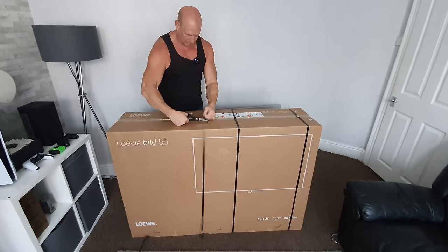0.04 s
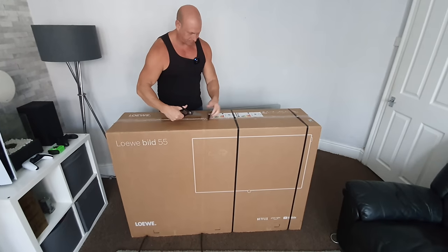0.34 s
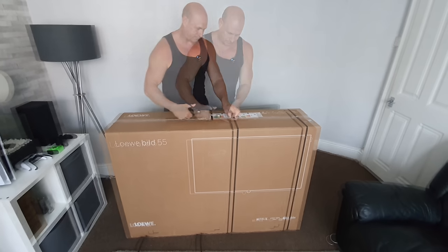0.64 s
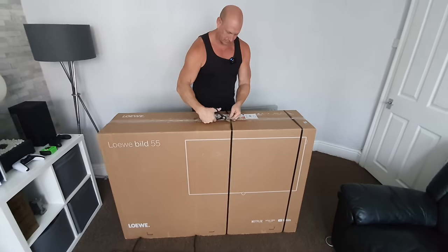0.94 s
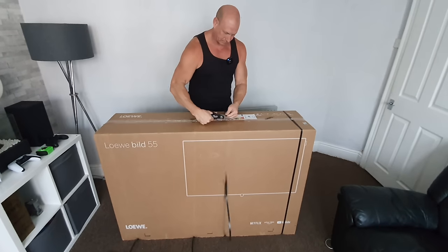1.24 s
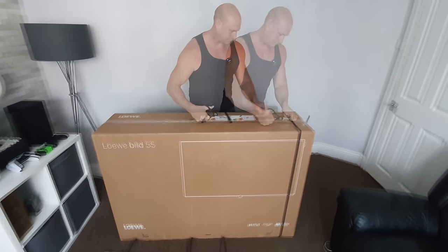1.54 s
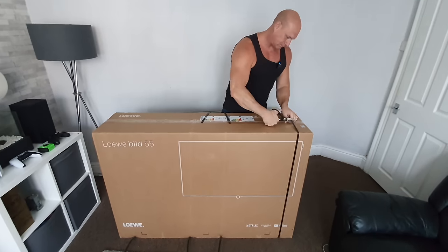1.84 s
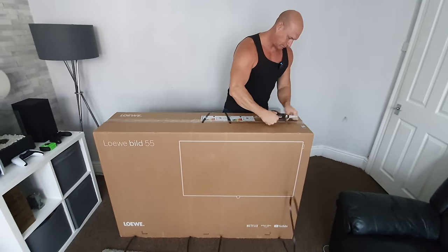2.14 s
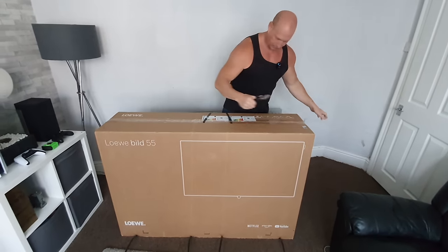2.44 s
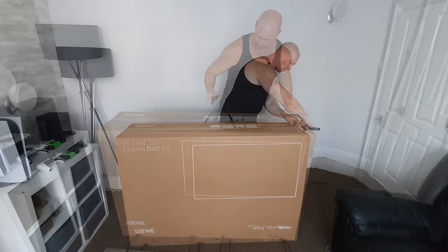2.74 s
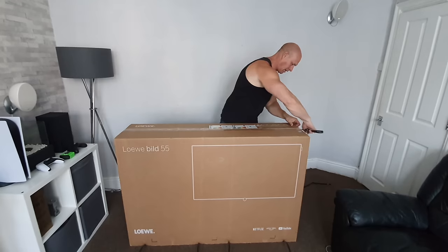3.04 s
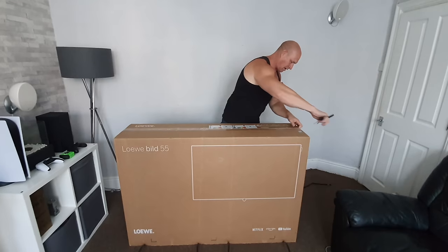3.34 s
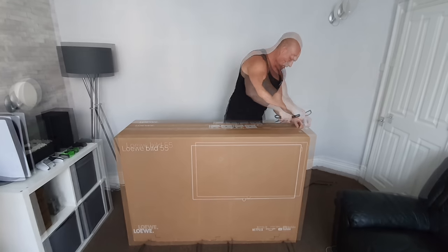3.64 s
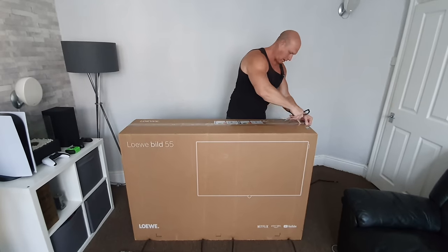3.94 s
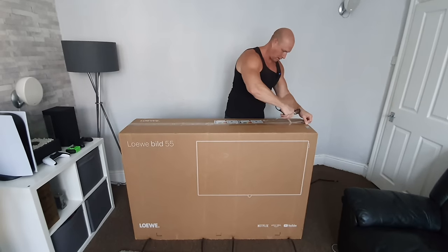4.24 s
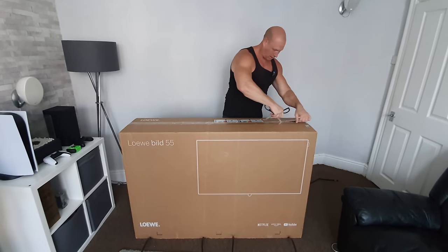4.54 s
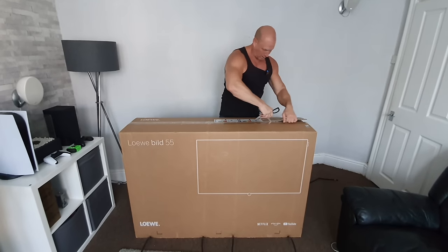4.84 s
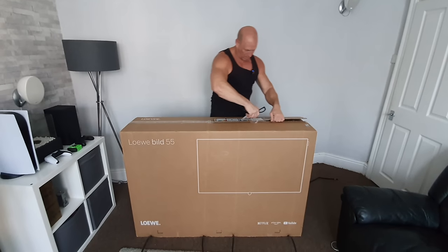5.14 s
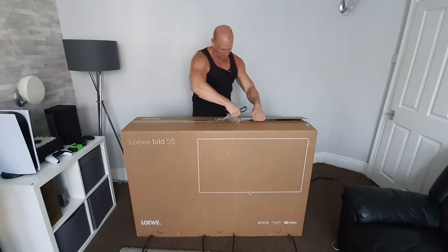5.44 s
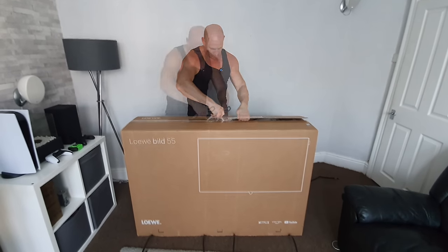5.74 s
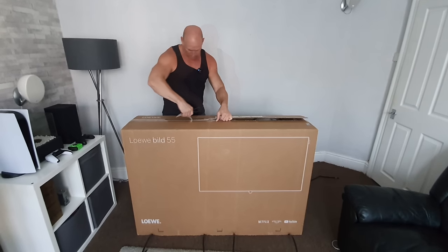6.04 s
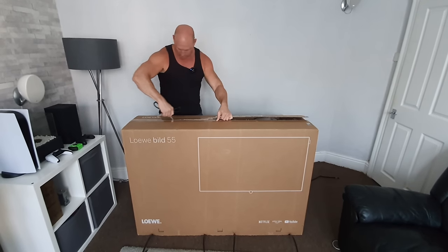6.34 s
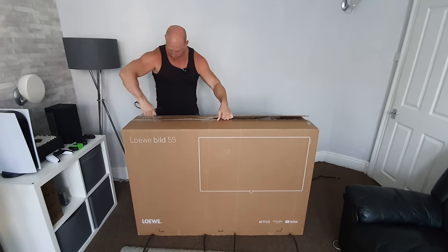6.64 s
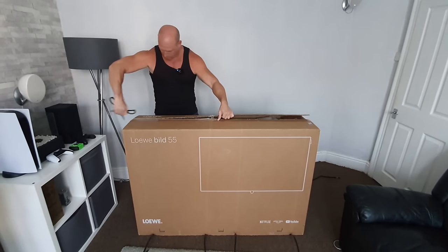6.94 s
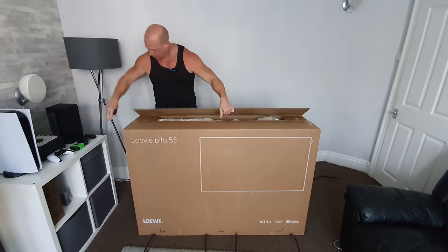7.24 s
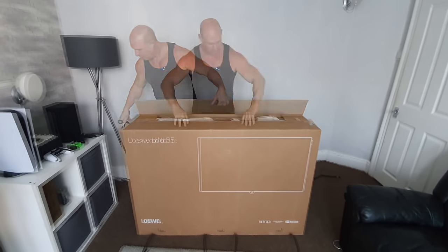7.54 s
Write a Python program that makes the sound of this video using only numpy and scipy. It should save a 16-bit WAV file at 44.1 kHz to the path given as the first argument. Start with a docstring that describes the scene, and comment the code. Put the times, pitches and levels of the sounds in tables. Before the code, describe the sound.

Right at the start, scissors snap through a taut plastic band with a sharp crack and a slap on a large cardboard box. Light taps and knocks follow around 0.4 to 0.7 seconds. Two more bands snap at about 1.2 and 2 seconds, with brief sliding and flicking against the board. Near 3 seconds the scissors tap the box and clack loudly, then hands bump softly on it. From about 4 seconds a blade drags along the taped seam: a gritty hiss and rasp with sharp crackles, over a low juddering drone from the hollow box. The scrape grows louder around 5 seconds and snags repeatedly, hardest near 6.8 seconds. At 7.1 seconds the flap springs up with a loud burst of knocks, followed by a faint slide and tap at 7.5 seconds. The sound is close and mono, in a quiet room with short reverberation.

```python
"""A sharp crack and a slap on cardboard: scissors snip a taut plastic packing band, which flails against a
big box in a living room. Two more bands follow. A blade then pierces the sealing tape and is dragged along
the seam: the tape crackles as it splits and the top panel drones as the blade catches, until the flap
springs up with a burst of knocks. One close microphone, the same in both channels."""
import sys
import numpy as np
from scipy import signal
from scipy.fft import rfft, irfft
from scipy.io import wavfile
from scipy.ndimage import uniform_filter1d

SR = 44100
rng = np.random.default_rng(int(sys.argv[2]) if len(sys.argv) > 2 else 0)


def persist_wave(psi):
    """Save psi, clipped to +-1, as 16-bit WAV."""
    counts = np.round(np.clip(psi, -1, 1) * 32767).astype(np.int16)
    wavfile.write(sys.argv[1], SR, np.atleast_2d(counts).T)


N = 333893
TIME = np.arange(N) / SR
AGE = TIME[:N // 20]   # seconds since a hit

# Levels in the tables are relative: each layer's filters and faders come after them.
# Colour of the room tone and of the reverb. Each row: frequency in Hz, level in dB.
ROOM_TONE = [(40, -27), (100, -10), (200, 1.5), (380, -9), (550, -4.5), (750, -6), (1030, -3),
             (1350, -23.5), (2500, -23.5), (5500, -27.5), (9000, -33), (16000, -54.5)]
REVERB_COLOUR = [(50, -6), (120, 2), (300, 4.5), (600, 2.5), (1200, 1), (2500, -1.5), (4500, -7),
                 (8000, -9.5), (11000, -9), (16000, -23)]
# Reverb decay. Each row: frequency in Hz, seconds to fall 60 dB.
REVERB_DECAY = [(60, 0.42), (200, 0.44), (500, 0.5), (1500, 0.48), (4000, 0.42), (8000, 0.38), (16000, .3)]

# Hands rub the board. Each row: midpoint and length in seconds, level in dB, centre in Hz.
HAND_RUBS = [(0.027, 0.053, -30.5, 215), (.626, 0.044, -30.5, 235), (0.928, 0.21, -53, 230),
             (1.111, 0.067, -38.5, 250), (1.154, .06, -27.5, 180), (1.539, .08, -39.5, 270),
             (2.018, 0.078, -34, 260), (3.823, 0.086, -44.5, 130)]
# Handled bands rustle. Each row: midpoint and length in seconds, level in dB.
BAND_RUSTLES = [(0.63, 0.027, -61), (0.902, 0.22, -65.5), (1.784, 0.07, -71), (1.99, .08, -59),
                (2.927, .09, -48), (2.997, .16, -41.5)]
# Hands shift on the box. Each row: start and end in seconds, level in dB.
HAND_SHIFTS = [(1.69, 1.8, -44), (3.574, 3.69, -39.5), (3.78, 4.1, -35.5)]
# Bands, blades and hands slide on the board; the flap flexes and puffs air.
# Each row: midpoint and length in seconds, level in dB, centre and width in Hz.
BOARD_SLIDES = [(.027, 0.03, -39, 6300, 5600), (0.31, 0.33, -49.5, 500, 402),
                (0.46, 0.029, -47, 3500, 2500), (.72, 0.38, -52.5, 4800, 5700),
                (1.155, .05, -34.5, 8000, 5000), (1.27, .24, -31, 530, 27), (1.21, 0.11, -27.5, 1800, 920),
                (2.25, 0.24, -44.5, 6700, 4700), (1.1, .04, -59, 5000, 6000),
                (2.77, 0.066, -44, 1945, 1790), (3.3, 0.36, -56.5, 4100, 6120),
                (4.73, 0.024, -38, 7970, 420), (5.826, 0.056, -33, 4500, 500),
                (5.82, 0.047, -33, 12500, 3500), (6.025, 0.066, -39, 4000, 460),
                (6.59, 0.033, -37, 1800, 160), (6.9, 0.035, -32.5, 1900, 160), (6.82, 0.31, -35, 710, 570),
                (7.48, 0.26, -59, 3300, 5200)]
FLAP_PUFFS = [(3.11, 0.18, -45, 63, 45), (5.37, 0.14, -34, 64, 27), (7.17, 0.22, -34, 49, 27),
              (7.13, 0.1, -14.5, 293, 44)]

# Modes of the big panels, the hand-damped blades and the scissor shanks held in the fist.
# Each row: frequency in Hz, level in dB, seconds to fall 60 dB.
PANEL_RING = [(100, -5.5, 0.09), (126.9, 0.5, 0.29), (156, -0.5, 0.36), (208.5, -6, 0.66)]
BLADE_RING = [(3850, -7, .009), (4600, 0, .007), (6550, 1, .005), (8000, -2, .005), (11300, -15, .003)]
SHANK_RING = [(1480, 0, .011), (2750, 0, .007), (4300, -2, .004), (7500, -3, .002)]
# Resonances of the box walls. Each row: centre and width in Hz, level in dB.
WALL_RESONANCES = [(254, 87, 1.5), (550, 30, -3.5), (770, 110, -6.5), (1100, 120, -10.5), (1620, 800, -5),
                   (2730, 850, -6.5)]
# Loose bands, scissors and flap hit the box.
# Each row: start in seconds, level in dB, pitch of the dent in Hz, surface crack in dB.
BOX_KNOCKS = [(0.651, -18.5, 300, -27.5), (.659, -20.5, 1000, -31), (.666, -16.5, 940, -26),
              (.671, -25, 294, -25.5), (0.737, -21.5, 395, -44), (.861, -31.5, 383, -49),
              (1.438, -19.5, 400, -28), (1.520, -22.5, 321, -40.5), (1.919, -37, 272, -63),
              (2.747, -28, 1300, -32), (3.065, -11.5, 574, -12.5), (3.072, -15.5, 270, -17.5),
              (3.697, -31, 153, -50), (4.126, -23.5, 1210, -28), (5.705, -15.5, 1240, -18),
              (7.091, -3, 700, -17), (7.0935, -9, 290, -34), (7.119, -1.5, 636, -13),
              (7.127, -1.5, 294, -8), (7.134, -9.5, 764, -32), (7.517, -31.5, 720, -28.5)]
# Scissors tap the stiff edge of the box.
# Each row: start in seconds, level in dB, pitch of the dent in Hz, steel ring in dB.
EDGE_TAPS = [(0.3936, -10.5, 614, -32), (0.4951, -20, 560, -47), (.838, -32, 1340, -40),
             (1.974, -20, 427, -48), (2.914, -23.5, 700, -19.5), (2.957, -16, 594, -20)]
# The blades tick. Each row: start in seconds, level in dB, brightness in dB per octave.
BLADE_TICKS = [(2.996, -17, 9), (3.0567, -1, 12), (4.678, -15.5, 7), (5.1177, -13, 23), (5.94, -18, 34),
               (6.0077, -11, -24), (6.3864, -7, 14), (7.025, -13.5, 22), (7.091, -3.5, -7)]
# Plastic and tape crack on their own. Each row: start in seconds, level in dB, centre in Hz.
STRAY_CRACKS = [(.340, -29, 4460), (.381, -32, 7900), (.407, -27.5, 7920), (1.086, -48, 5950),
                (1.335, -20.5, 8200), (2.013, -24, 7080), (2.018, -22, 6980), (2.756, -33, 3470),
                (2.977, -26.5, 9030), (3.69, -30.5, 4000), (5.0462, -13.5, 3940), (5.133, -24, 4000),
                (5.2862, -16.5, 6000), (5.2992, -16, 5900), (5.384, -20.5, 4800), (5.474, -17, 4300),
                (5.5728, -13, 5600), (5.615, -21, 6000), (5.655, -18, 5000), (5.66, -22, 8000),
                (5.992, -27, 4420), (6.046, -23, 3700)]

# The blade's ride along the seam. Each row: time in seconds, push on the panel in dB, tape hiss in dB.
SEAM_LEVELS = [(3.6, -64, -61.5), (3.69, -68, -55), (3.77, -68, -61), (4.05, -46, -48),
               (4.15, -32.5, -45.5), (4.46, -33.5, -43.5), (4.72, -28.5, -45), (4.92, -32.5, -45),
               (5.11, -22, -36.5), (5.27, -28.5, -43), (5.30, -27, -37), (5.40, -24.5, -39),
               (5.52, -24.5, -39), (5.72, -32.5, -38), (5.79, -39, -47.5), (5.82, -24.5, -39),
               (6.05, -34, -38.5), (6.14, -25, -41.5), (6.42, -26.5, -35), (6.95, -26, -39.5),
               (7.06, -21.5, -61)]
# The top panel drones lowest at its slack middle. Each row: time in seconds, pitch in Hz.
DRONE_PITCH = [(3.95, 274), (4.8, 278), (5.12, 245), (5.4, 276), (5.81, 256.6), (6.47, 290), (7.06, 295)]
# Steel scrapes on tape, tuned by the slant of the blade. Each row: time in seconds, pitch in Hz.
SCRAPE_PITCH = [(4.2, 7940), (5.7, 8200), (5.9, 9300), (6.3, 7240), (6.6, 8700), (6.95, 7100)]
# Colours of the drag: panel rumble, board rasp, tape hiss. Each row: frequency in Hz, level in dB.
RUMBLE_EQ = [(45, -38), (65, -8), (90, -7), (112, 14.5), (140, -5), (190, 10.5), (260, -9), (400, -31.5)]
RASP_EQ = [(250, 6), (390, 13), (500, 4.5), (650, 0.5), (850, 2), (1150, -2), (1400, -7), (1850, -4.5),
           (2400, -25.5), (3500, -31), (6000, -83)]
HISS_EQ = [(1500, 6.5), (2500, 5), (3300, 2), (4400, 6), (5400, 5.5), (6400, 8.5), (8000, 4.5), (10000, 5),
           (12500, -6), (16000, -12)]
# The blade snags in the board. Each row: midpoint in seconds, panel swing in dB, rasp in dB.
BLADE_SNAGS = [(3.999, -39.5, -35), (4.093, -32, -45), (4.135, -30, -33), (4.175, -27.5, -40),
               (4.223, -37, -24), (4.255, -26, -37), (4.276, -28, -32), (4.307, -25, -31), (4.34, -30, -46),
               (4.385, -26, -45), (4.415, -25.5, -36), (4.52, -26.5, -37), (4.553, -27, -33),
               (4.59, -24, -35), (4.685, -30, -30), (4.729, -26, -37.5), (4.757, -27.5, -42),
               (4.822, -31, -42), (4.973, -24.5, -32.5), (5.072, -17.5, -25.5), (5.106, -15.5, -28),
               (5.176, -13.5, -32), (5.295, -31, -28), (5.34, -19.5, -38), (5.389, -29, -38),
               (5.525, -25, -46), (5.832, -23, -35), (5.888, -21, -38), (6.012, -22.5, -34),
               (6.166, -23.5, -31), (6.227, -24, -34), (6.289, -37, -34), (6.597, -23.5, -31.5),
               (6.614, -24, -29), (6.668, -26, -25.5), (6.746, -27, -29), (6.786, -12.5, -23.5),
               (6.854, -19, -23.5), (6.915, -16.5, -25), (6.952, -20, -35)]
# A tape snap timed after all other events, past the end of the track, so it is not heard.
# One row: break time in seconds, level in dB, build-up in seconds.
LATE_TAPE_SNAP = (8.4, -7, 0.0028)
# Scissors go through a band. Each row: break time in seconds, crack in dB, build-up in seconds,
# lead of the bite in seconds, bite in dB, blade brightness in dB per octave, box recoil in dB,
# recoil pitch in Hz, slap in dB, slap pitch in Hz.
BAND_SNIPS = [(0.049, -1.5, 0.00092, 0.0064, -10.5, 0.5, -3, 480, -5.5, 870),
              (1.1694, -9.5, 0.0045, 0.0048, -6.5, 5, -4, 450, -8, 760),
              (2.0393, -3, 0.0032, 0.016, -7.5, 1, -5, 564, -12, 760)]


def from_db(db):
    """Decibels to gain."""
    return 10 ** (np.asarray(db) / 20)


def unit_rms(x):
    """Scale to unit power."""
    return x / np.sqrt(np.mean(x ** 2) + 1e-20)


def unit_peak(x):
    """Scale to a peak of one."""
    return x / np.max(np.abs(x))


def at_hz(points, hz):
    """Read a table on a log-frequency axis."""
    table = np.array(points)
    return np.interp(np.log(hz + 1), np.log(table[:, 0]), table[:, 1])


def add(track, s, sound):
    """Mix a sound into the track from time s on."""
    start = max(round(s * SR), 0)
    track[start:start + len(sound)] += sound[:N - start]


def cut(x, hz, kind, order=2):
    """Butterworth filter."""
    return signal.sosfilt(signal.butter(order, np.clip(hz, 10, .48 * SR), kind, fs=SR, output="sos"), x)


def resonance(x, hz, width_hz):
    """Two-pole resonance with gain 1 at its peak."""
    r = np.exp(-np.pi * width_hz / SR)
    poles = [1, -2 * r * np.cos(2 * np.pi * hz / SR), r * r]
    return signal.lfilter(np.array([1, 0, -1]) * (1 - r * r) / 2, poles, x + 1e-18)


def gliding_resonance(x, hz, width_hz):
    """A resonance that follows a pitch curve."""
    carrier = np.exp(2j * np.pi * np.cumsum(hz) / SR)
    return np.real(carrier * cut(x / carrier, width_hz / 2, "low"))


def coloured(x, eq):
    """EQ a steady texture and bring it to unit power."""
    return unit_rms(irfft(rfft(x) * from_db(at_hz(eq, np.fft.rfftfreq(N, 1 / SR))), N))


def levelled(x, span_s):
    """Ride the gain to unit power over each span, so only quick flutter stays."""
    return x / np.sqrt(np.abs(uniform_filter1d(x ** 2, int(span_s * SR))) + 1e-9)


def wander(per_s):
    """A drifting control: ramps between random values of unit spread."""
    knots = rng.standard_normal(int(per_s * N / SR) + 2)
    return np.interp(TIME * per_s, np.arange(len(knots)), knots)


def slips(per_s, spread_db):
    """Stick and slip: random clicks of very uneven size."""
    sizes = from_db(spread_db * np.minimum(rng.exponential(1, N), 4)) * rng.choice([-1, 1], N)
    return sizes * (rng.random(N) < per_s / SR)


def struck(modes, spread_db, detune):
    """One hit: every mode rings with a strength and tuning of its own."""
    hz, db, t60 = np.array(modes).T[:, :, None]
    strength, tuning = rng.standard_normal((2, len(modes), 1))
    decays = from_db(db + spread_db * strength - 60 * AGE / t60)
    return np.sum(decays * np.sin(2 * np.pi * hz * (1 + detune * tuning) * AGE), axis=0)


def smeared_click(transit_s):
    """A click runs to and fro in thin material: spread in time, flat in spectrum."""
    click = signal.unit_impulse(len(AGE))
    for lag in np.ceil(rng.uniform(.3, 1, 4) * transit_s * SR).astype(int):
        allpass = np.r_[1, np.zeros(lag), .5]
        click = signal.lfilter(allpass[::-1], allpass, click + 1e-18)
    return click


def room_tone():
    """The bed: faint, dark noise of a quiet room."""
    return from_db(-60.5) * coloured(rng.standard_normal(N), ROOM_TONE)


def room_response(first_echo_s=.00083, build_s=.0081):
    """Dense echoes off near walls, dying band by band."""
    edges = np.geomspace(40, 18000, 25)
    late = np.maximum(TIME[:SR] - first_echo_s, 0)
    fade_in = 1 - np.exp(-late / build_s)
    white, out = rng.standard_normal((2, SR)), 0
    for k, (low, high) in enumerate(zip(edges, edges[1:])):
        hz = np.sqrt(low * high)
        band = cut(white[k % 2], [low, high], "band") * from_db(-60 * late / at_hz(REVERB_DECAY, hz))
        band *= fade_in
        unity_gain = np.sqrt(2 * (high - low) / SR / np.sum(band ** 2))
        out += band * unity_gain * from_db(at_hz(REVERB_COLOUR, hz))
    return out


def room_reverb(send, positions=6):
    """Echo patterns crossfade as the sources move along the box."""
    out, place = np.zeros(N), np.linspace(0, positions - 1, N)
    for k in range(positions):
        near = np.flatnonzero(np.abs(place - k) < 1)
        crossfade = np.cos(np.pi / 2 * (place[near] - k))
        add(out, TIME[near[0]], signal.fftconvolve(send[near] * crossfade, room_response()))
    return out


def crack_wash(send, level_db=-1, build_s=.0074):
    """The room smears a crack into noise: each band stores its energy and lets it die away."""
    edges = np.geomspace(700, 17000, 11)
    white, out = rng.standard_normal((2, N)), 0
    for k, (low, high) in enumerate(zip(edges, edges[1:])):
        hz = np.sqrt(low * high)
        energy = cut(send + 1e-9, [low, high], "band") ** 2 + 1e-18
        release, attack = from_db(-120 / (at_hz(REVERB_DECAY, hz) * SR)), np.exp(-1 / (build_s * SR))
        for pole in (release, attack):
            energy = signal.lfilter([1 - pole], [1, -pole], energy)
        noise = unit_rms(cut(white[k % 2], [low, high], "band"))
        out += from_db(level_db + at_hz(REVERB_COLOUR, hz)) * np.sqrt(energy) * noise
    return out


def rubs_and_rustles():
    """Skin creeps over the board in tiny slips and loose bands crinkle; each move swells and fades."""
    creep, crinkle = slips(per_s=1500, spread_db=2.5), slips(per_s=1600, spread_db=4)
    crinkle = levelled(cut(resonance(crinkle, 4200, width_hz=6000), 1100, "high"), span_s=.079)
    rubs = [(*row, levelled(resonance(creep, hz, width_hz=76), span_s=.053)) for *row, hz in HAND_RUBS]
    rustles = [(*row, crinkle) for row in BAND_RUSTLES]
    out = np.zeros(N)
    for s, length_s, db, friction in rubs + rustles:
        swell, start = signal.windows.hann(int(length_s * SR)), int(s * SR)
        add(out, s - length_s / 2, from_db(db) * swell * friction[start:start + len(swell)])
    return out


def swishes(rows):
    """Friction or moving air: noise swells and fades in one resonance."""
    out = np.zeros(N)
    for s, length_s, db, hz, width_hz in rows:
        swell = signal.windows.hann(int(length_s * SR))
        friction = resonance(rng.standard_normal(SR), hz, width_hz)[-len(swell):]
        add(out, s - length_s / 2, from_db(db) * swell * unit_rms(friction))
    return out


def hand_bump_cues(gap_s=.064, hz=190, spread_db=5.5):
    """Soft, uneven bumps on the box while the hands shift."""
    cues = []
    for start, end, db in HAND_SHIFTS:
        for k, (late, strength, pitch) in enumerate(rng.uniform(-1.2, 1, (8, 3))):
            s = start + gap_s * (k + .5 * abs(late))
            if s < end:
                cues.append((s, db + spread_db * strength, hz * 2 ** (.5 * pitch)))
    return cues


def cardboard_knocks(cues, dent_cycles, rattle_db, rattle_s, swing_db, walls_db, low_cut_hz):
    """The board dents and springs back; its flutes rattle and the big panels swing on."""
    dents, panels = np.zeros(N), np.zeros(N)
    for s, db, hz in cues:
        dent = unit_peak(np.sin(2 * np.pi * hz * AGE) * AGE * np.exp(-AGE * hz / dent_cycles))
        rattle = unit_rms(resonance(rng.standard_normal(len(AGE)), hz, hz)) * np.exp(-AGE / rattle_s)
        add(dents, s, from_db(db) * cut(dent + from_db(rattle_db) * rattle, 3.5 * hz, "low", order=4))
        panel_db = db + swing_db - 6 * np.log2(hz / 303.5)   # broad, low dents swing the panels most
        add(panels, s, from_db(panel_db) * struck(PANEL_RING, spread_db=2, detune=.03))
    walls = sum(from_db(db + walls_db) * resonance(dents, hz, width) for hz, width, db in WALL_RESONANCES)
    return cut(dents + panels + walls, low_cut_hz, "high", order=5)   # the box radiates little deep bass


def scissor_taps():
    """Scissors knock on the stiff edge of the box and their shanks ring briefly."""
    out = cardboard_knocks([row[:3] for row in EDGE_TAPS], dent_cycles=.37, rattle_db=-17, rattle_s=.006,
                           swing_db=-21, walls_db=-7, low_cut_hz=110)
    for s, _, _, db in EDGE_TAPS:
        ring = struck(SHANK_RING, spread_db=2, detune=.02)
        add(out, s, from_db(db) * unit_peak(signal.fftconvolve(smeared_click(transit_s=.0005), ring)))
    return out


def blade_clacks(cues):
    """Steel meets steel, chatters for an instant and rings briefly."""
    out = np.zeros(N)
    for s, db, tilt in cues:
        modes = [(hz, level + tilt * np.log2(hz / BLADE_RING[0][0]), t60) for hz, level, t60 in BLADE_RING]
        ring = struck(modes, spread_db=1, detune=.035)
        chatter = signal.fftconvolve(smeared_click(transit_s=.0002), ring)
        add(out, s, from_db(db) * unit_peak(cut(chatter, 3200, "high", order=3)))
    return out


def cracks(cues, transit_s, width_ratio, low_cut_hz):
    """Plastic, tape or the board's surface cracks in tiny, wide-band bursts."""
    out = np.zeros(N)
    for s, db, hz in cues:
        add(out, s, from_db(db) * unit_peak(resonance(smeared_click(transit_s), hz, width_ratio * hz)))
    return cut(out, low_cut_hz, "high", order=1)


def tape_split_cues(per_s=12, over_hiss_db=3.5, spread_db=5, hz=7300):
    """The tape splits ahead of the blade at random moments, riding the level of its hiss."""
    s, _, hiss_db = np.transpose(SEAM_LEVELS)
    wait, strength, pitch = rng.random((80, 3)).T
    times = s[0] + np.cumsum(-np.log(1 - wait)) / per_s
    db = np.interp(times, s, hiss_db) + over_hiss_db + spread_db * (2 * strength - 1)
    return [cue for cue in zip(times, db, hz * 2 ** (2 * pitch - 1)) if cue[0] < s[-1]]


def stroke(rows):
    """Automation for the drag: blade contact from 0 to 1, then a curve for each column after the time."""
    s, *columns = np.transpose(rows)
    contact = np.interp(TIME, [s[0] - .03, s[0], s[-1], s[-1] + .027], [0, 1, 1, 0])
    return [contact] + [np.interp(TIME, s, column) for column in columns]


def snags(length_s=.0299):
    """Each snag swings the panel for a few cycles near its drone pitch and lifts the rasp's envelope."""
    swings, rasp_lift, swell = np.zeros(N), np.zeros(N), signal.windows.hann(int(length_s * SR))
    for s, swing_db, rasp_db in BLADE_SNAGS:
        hz = np.interp(s, *np.transpose(DRONE_PITCH)) * (1 + .043 * rng.standard_normal())
        tone = np.sqrt(2) * np.sin(2 * np.pi * hz * AGE[:len(swell)])
        add(swings, s - length_s / 2, from_db(swing_db) * swell * tone)
        add(rasp_lift, s - length_s / 2, from_db(rasp_db) * swell)
    return swings, rasp_lift


def panel_drone(catches):
    """The catching blade shakes the top panel: a gliding drone over a rumble."""
    pressing, pitch = stroke(DRONE_PITCH)
    drone = levelled(gliding_resonance(catches, pitch, width_hz=154), span_s=.0475)
    rumble = levelled(coloured(catches, RUMBLE_EQ), span_s=.076)
    return pressing * (from_db(-5) * drone + from_db(-8.5) * rumble)


def board_rasp(catches, grains):
    """The blade rasps on cardboard, with a hollow note from the gap under the flap."""
    gap_hz = 620 * np.exp(.18 * wander(per_s=13))
    hollow = unit_rms(gliding_resonance(catches, gap_hz, width_hz=172))
    return levelled(coloured(catches + .5 * grains, RASP_EQ) + from_db(-7) * hollow, span_s=.029)


def tape_hiss(grains):
    """Tape parts in fine grains while the steel grips it and lets go by turns."""
    _, pitch = stroke(SCRAPE_PITCH)
    hiss = levelled(coloured(grains, HISS_EQ), span_s=.3)
    for ratio in (1, .548):   # the blade's pitch and a lower mode
        grip = from_db(-14 + 6 * wander(per_s=22))
        hiss += grip * unit_rms(gliding_resonance(grains, ratio * pitch, width_hz=1840))
    return hiss


def seam_drag(lurch_db=.5, judder_db=4, spurt_db=1.3, rasp_follows_push=.59):
    """The blade is dragged down the seam; returns the panel's low end and the scrape above it."""
    cutting, push_db, tape_db = stroke(SEAM_LEVELS)
    push_db += lurch_db * wander(per_s=16)   # the hand advances in small jerks
    board_db = tape_db + rasp_follows_push * (push_db - tape_db)
    judder = from_db(judder_db * wander(per_s=50))   # the blade sticks and runs free by turns
    catches = unit_rms(slips(per_s=600, spread_db=3))
    grains = unit_rms(unit_rms(slips(per_s=4500, spread_db=3.8)) + .25 * catches)
    rasp = board_rasp(catches, grains)
    swings, snag_lift = snags()
    hiss = tape_hiss(grains)
    spurts = from_db(tape_db - 2.5 + spurt_db * wander(per_s=27))   # the tape tears in spurts
    rasp_gain = judder * from_db(board_db - 3) + snag_lift
    hiss_gain = np.sqrt(judder) * spurts + from_db(-16) * snag_lift
    panel = judder * from_db(push_db) * panel_drone(catches) + swings
    return panel, cutting * (rasp_gain * rasp + hiss_gain * hiss)


def blade_entry_cues(bite_lengths=4.1, db=-53, hz=6000, width_hz=5000):
    """Steel hisses under the band into each snip; the slower the bite, the longer the hiss."""
    return [(s - bite_lengths * bite_s / 2, bite_lengths * bite_s, db, hz, width_hz)
            for s, _, _, bite_s, *_ in BAND_SNIPS]


def snip_cues(bite_hz=7000, recoil_lead_s=.001, shut_lag_s=.0042, slap_gap_s=.006, slap_loss_db=1.5):
    """The blades bite, the box recoils, the band breaks, the blades shut and the freed band flails."""
    breaks, shuts, bites, hits = [], [], [], []
    for s, db, build_s, bite_s, bite_db, tilt, recoil_db, recoil_hz, slap_db, slap_hz in BAND_SNIPS:
        breaks.append((s, db, build_s))
        shuts.append((s + shut_lag_s, .5, tilt))
        bites.append((s - bite_s, bite_db, bite_hz))
        hits.append((s - recoil_lead_s, recoil_db, recoil_hz))
        for k, (late, pitch) in enumerate(rng.uniform(-1, 1, (6, 2))):
            slap_s = s + slap_gap_s * (k + 1 + .25 * late)
            hits.append((slap_s, slap_db - slap_loss_db * k, slap_hz * 2 ** (.45 * pitch)))
    return breaks, shuts, bites, hits


def plastic_snaps(cues, release_s=.00077, fizz_db=-13.5, lead_s=.02):
    """Fibres part in a steep crescendo until the strip lets go."""
    out = np.zeros(N)
    for s, db, build_s in cues:
        swell = np.exp(np.minimum((AGE - lead_s) / build_s, (lead_s - AGE) / release_s))
        fibres = rng.standard_normal(len(AGE)) * swell
        snap = resonance(fibres, 5540, width_hz=3600) + from_db(fizz_db) * fibres
        add(out, s - lead_s, from_db(db) * unit_peak(snap))
    return out


def scene():
    """Mix the close sources with their reverb and the room tone, the same in both channels."""
    breaks, shuts, bites, hits = snip_cues()
    hits += [row[:3] for row in BOX_KNOCKS] + hand_bump_cues()
    snaps = plastic_snaps(breaks + [LATE_TAPE_SNAP])
    steel = blade_clacks(shuts + list(BLADE_TICKS))
    split_cues = bites + list(STRAY_CRACKS) + tape_split_cues()
    splits = cracks(split_cues, transit_s=.00044, width_ratio=.8, low_cut_hz=1000)
    surface_cues = [(s, db, 3440) for s, _, _, db in BOX_KNOCKS]   # a bright edge on each knock
    surface = cracks(surface_cues, transit_s=.0008, width_ratio=1, low_cut_hz=908)
    box = cardboard_knocks(hits, dent_cycles=.36, rattle_db=-11.5, rattle_s=.011,
                           swing_db=-20, walls_db=-1.5, low_cut_hz=83)
    taps = scissor_taps()
    panel, scrape = seam_drag()
    panel += swishes(FLAP_PUFFS)
    slides = from_db(-1) * swishes(list(BOARD_SLIDES) + blade_entry_cues())
    friction = scrape + slides + rubs_and_rustles()
    direct = snaps + steel + splits + surface + box + taps + panel + friction
    wash_send = from_db(8.5) * snaps + from_db(-1) * steel + from_db(3) * splits + from_db(5) * surface
    reverb_send = (from_db(-11.5) * steel + from_db(-6.5) * box + from_db(-9.5) * taps
                   + from_db(-13) * panel + from_db(-6) * friction)
    return np.tile(direct + crack_wash(wash_send) + room_tone() + room_reverb(reverb_send), (2, 1))


def record(dry):
    """The microphone drops the deep bass, dulls the treble, rounds the highest peaks and cuts the top."""
    heard = cut(cut(dry, 56, "high", order=6), 9700, "low", order=1)
    top_cut = signal.ellip(10, .1, 90, 16000, fs=SR, output="sos")
    return signal.sosfilt(top_cut, np.tanh(heard))


dry = scene()
out = record(dry)
persist_wave(out)
```